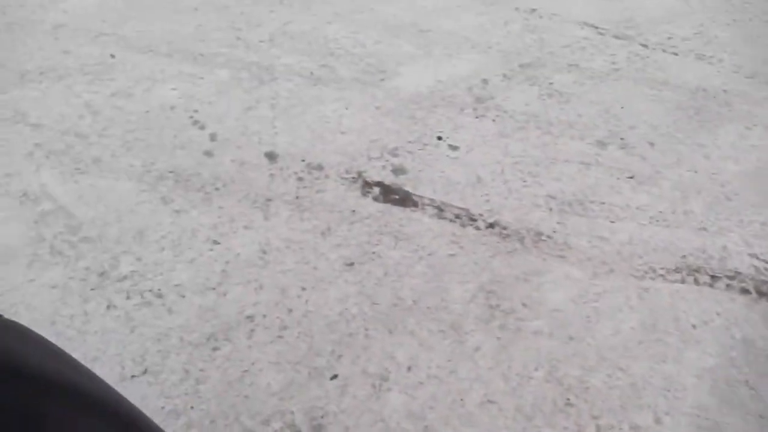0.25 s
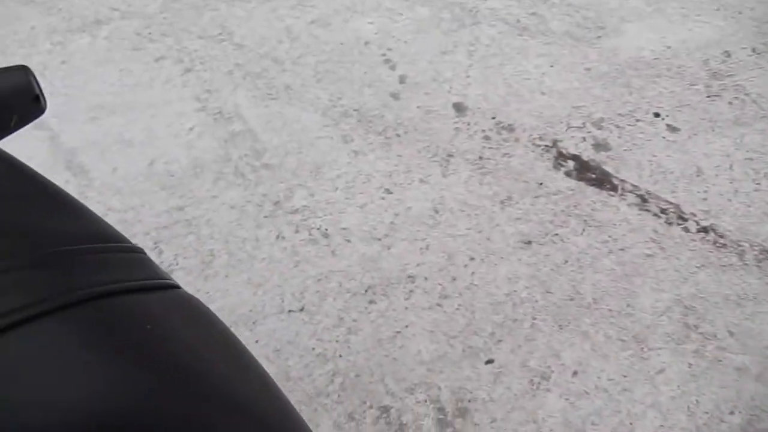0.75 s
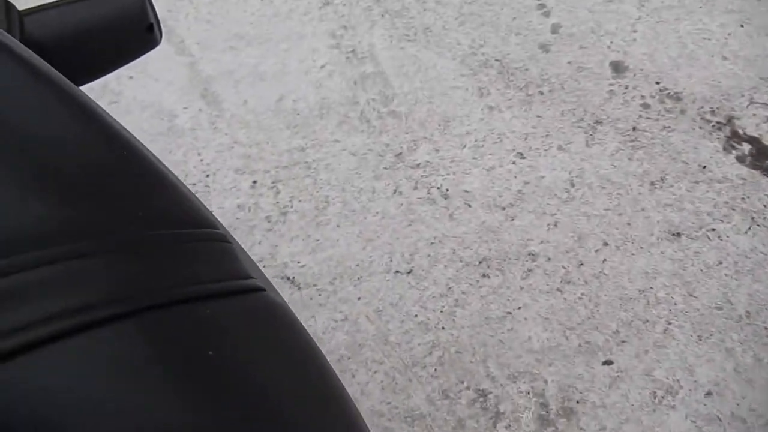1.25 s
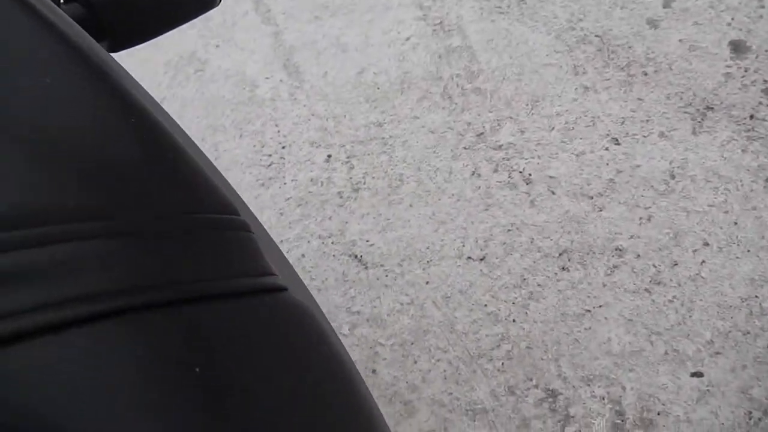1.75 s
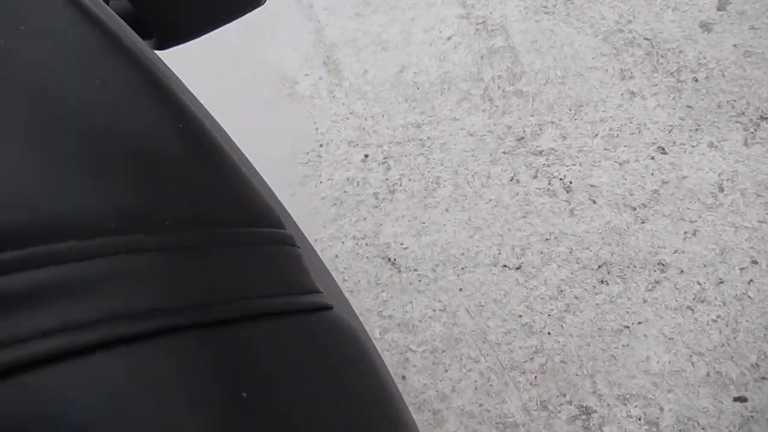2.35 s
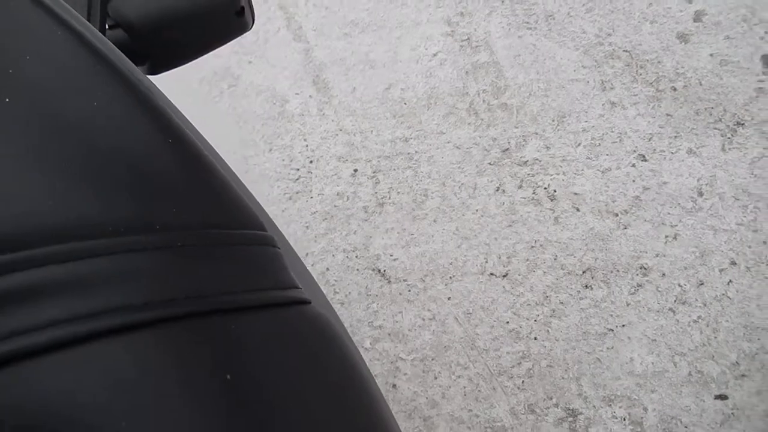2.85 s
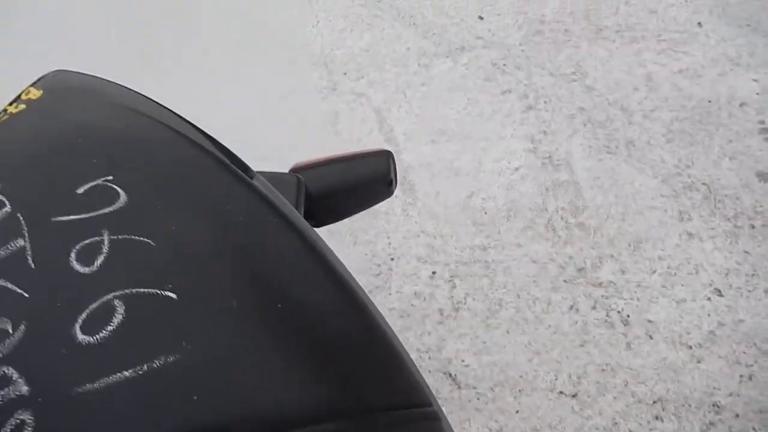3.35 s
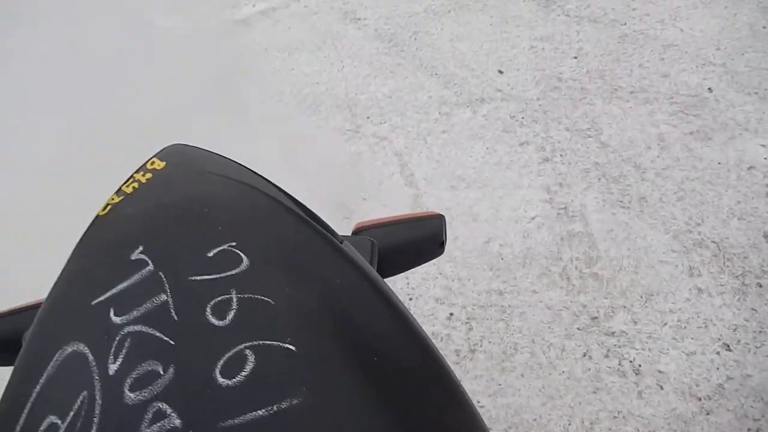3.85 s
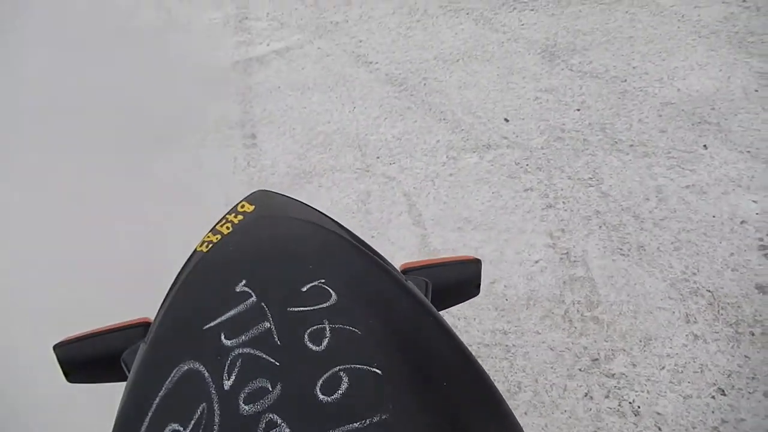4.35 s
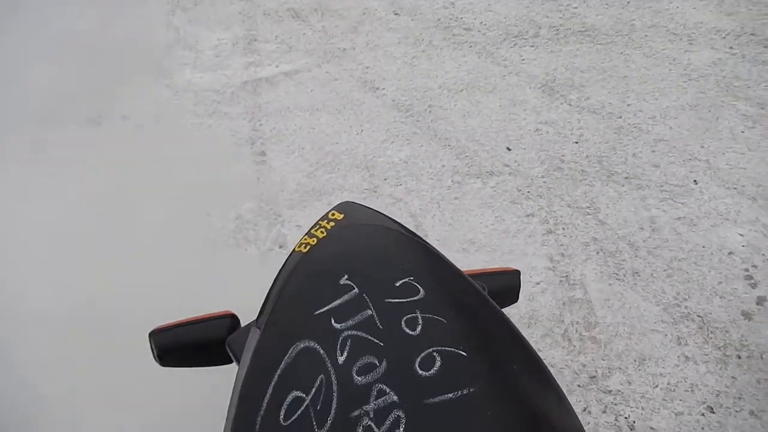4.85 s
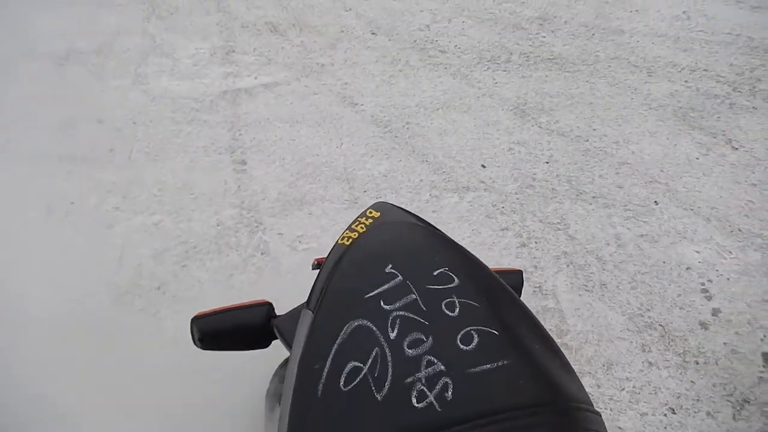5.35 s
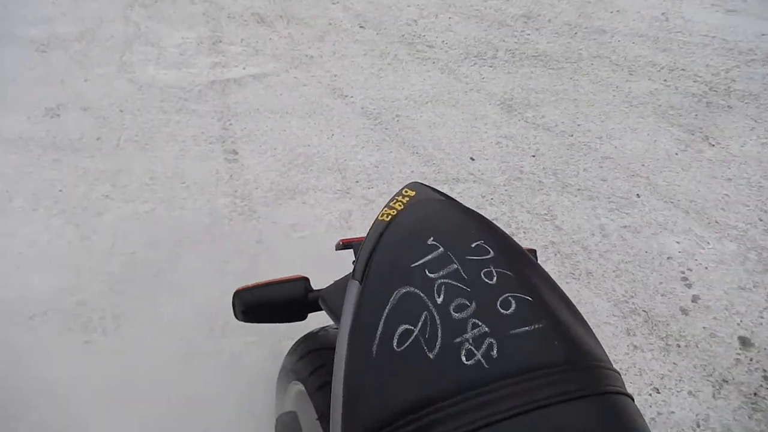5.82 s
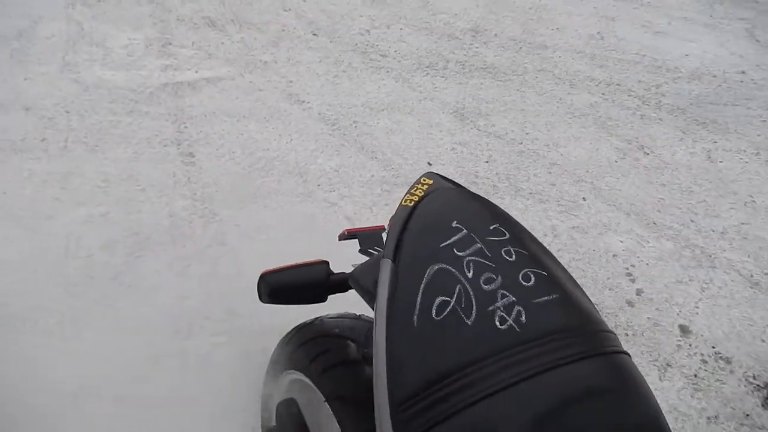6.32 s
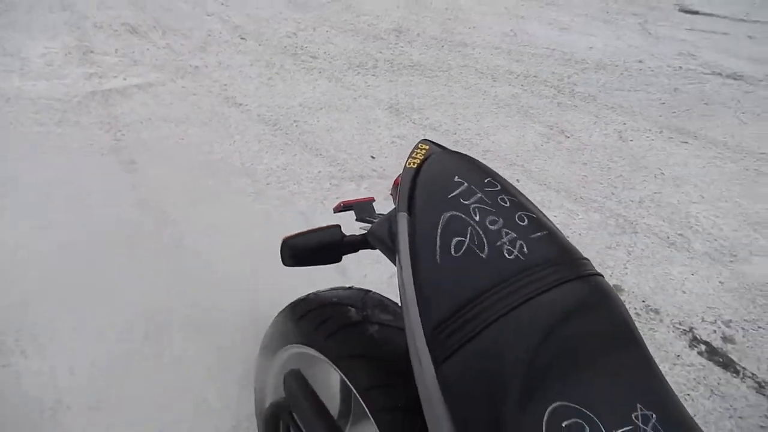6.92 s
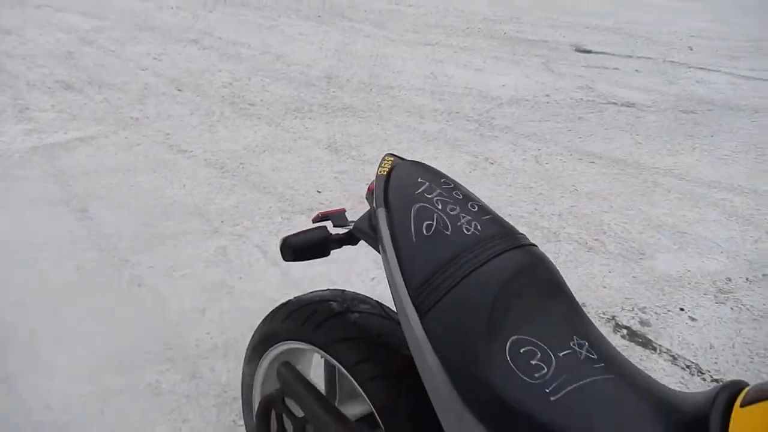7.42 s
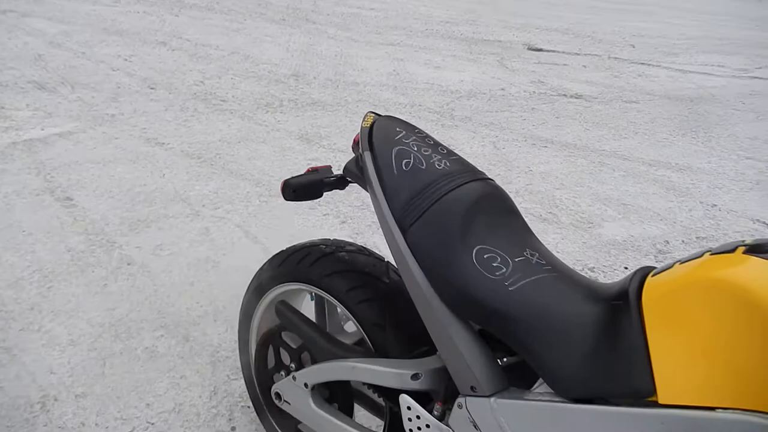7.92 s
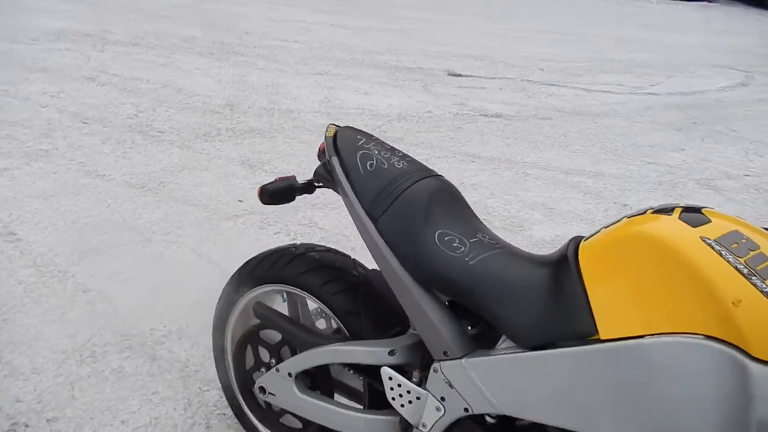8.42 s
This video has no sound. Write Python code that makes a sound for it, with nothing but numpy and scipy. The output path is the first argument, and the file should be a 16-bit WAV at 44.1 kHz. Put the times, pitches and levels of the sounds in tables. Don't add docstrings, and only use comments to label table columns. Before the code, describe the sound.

A hand-held stereo microphone sits near a motorcycle's exhaust in the open air. Deep, limping idle thumps alternate strong and weak over metallic ticking and rattling. Four uneven revs follow, gruff and snarling, with sharp pops and hollow honks from the air box. The note sags with breathy intake noise into a spitting, irregular idle, ending with brighter engine hiss and light ticks. Faint wind rumble lies beneath.

```python
import sys
import numpy as np
from scipy import signal
from scipy.fft import rfft, irfft, next_fast_len
from scipy.io import wavfile
from scipy.ndimage import uniform_filter1d

SR = 44100
rng = np.random.default_rng(int(sys.argv[2]) if len(sys.argv) > 2 else 0)


def put_to_file(sound):
    columns = np.atleast_2d(sound).T
    safe = np.clip(columns, -1, 1)
    whole_steps = np.round(safe * 32767)
    wavfile.write(sys.argv[1], SR, whole_steps.astype(np.int16))


def volts(x):
    e = np.asarray(x, float) / 20
    return 10 ** e


N = 382784
TIME_S = np.arange(N) / SR
FULL_BURN_DB = -9
IDLE_LOAD_DB = -45


def rms_one(x):
    return x / np.sqrt(np.mean(x ** 2) + 1e-20)


def curve(x, table):
    return np.interp(x, *np.transpose(table))


def at_hz(spectrum, hz):
    f, level = np.transpose(spectrum)
    return np.interp(np.log(hz), np.log(f), level)


def drift(rate):
    r = np.exp(-80 * np.pi * rate / SR)
    slow = signal.lfilter([1], [1, -2 * r, r * r], rng.standard_normal(N // 40 + 2002))[2000:]
    return np.interp(np.arange(N) / 40, np.arange(len(slow)), rms_one(slow))


def bumps(seconds, heights, widths_s):
    t = np.arange(0, N, 128)[:, None] / SR
    swells = heights * np.exp(-.5 * ((t - seconds) / widths_s) ** 2)
    return np.interp(TIME_S, t[:, 0], np.sum(swells, axis=1))


def clicks(seconds, sizes):
    out = np.full(N, 1e-18)
    out[np.clip((np.asarray(seconds) * SR).astype(int), 0, N - 1)] = sizes
    return out


def resonate(x, hz, width_hz):
    r = np.exp(-np.pi * width_hz / SR)
    top = np.array([1, 0, -1]) * (1 - r * r) / 2
    return signal.lfilter(top, [1, -2 * r * np.cos(2 * np.pi * hz / SR), r * r], x)


def coloured(x, spectrum):
    size = next_fast_len(N)
    hz = np.arange(size // 2 + 1) * SR / size + 1
    return irfft(rfft(x, size) * volts(at_hz(spectrum, hz)), size)[..., :N]


def thump(train, hz, spread_s, echo_s, echo_db):
    t = np.arange(-2000, 4001) / SR

    def burst(u):
        return -np.cos(2 * np.pi * hz * u) * np.exp(-.5 * (u / spread_s) ** 2)

    pulse = burst(t) + volts(echo_db) * burst(t - echo_s)
    return signal.fftconvolve(train, pulse)[2000:N + 2000]


# f/Hz, coherence/1
LIKENESS = [(100, .9), (500, .95), (1000, .78), (2000, .5), (4000, .7), (8000, .72), (14000, .3)]


def wide_noise():
    mid, side = rng.standard_normal((2, N))
    hz, alike = np.transpose(LIKENESS)
    alike = np.clip(alike, 0, .999)
    mid = coloured(mid, np.c_[hz, 10 * np.log10((1 + alike) / 2)])
    side = coloured(side, np.c_[hz, 10 * np.log10((1 - alike) / 2)])
    return np.array([mid + side, mid - side])


def facing(seconds):
    return np.where(np.asarray(seconds) > 8, 1.0, 0.0)


def wind():
    noise = rng.standard_normal(N)
    return volts(-51) * rms_one(resonate(resonate(noise, 30, 15), 30, 15))


# f/Hz, width/Hz, level/dB
GEAR_MODES = [(2336, 82, -54), (2800, 240, -52.5), (3780, 200, -58), (6300, 45, -62), (7700, 40, -68)]
GEAR_RISE = (6.5, 8.0)


def cam_gear():
    noise = rng.standard_normal(N) * volts(2.0 * drift(16))
    rings = 0
    for hz, width_hz, db in GEAR_MODES:
        rings += volts(db) * rms_one(resonate(resonate(noise, hz, width_hz), hz, width_hz))
    return np.interp(TIME_S, GEAR_RISE, [.25, 1]) * rings


# t/s, level/dB
INTAKE = [(0, -21), (1, -31), (2.08, -35), (2.6, -33.5), (4, -29.5), (4.5, -25.5), (5.1, -21.5),
          (5.6, -18.5), (6.3, -20), (6.8, -27.5), (7.3, -21), (8.68, -28)]
# t/s, rise/dB
GULPS = [(.32, 10), (.56, 8), (.83, 13), (1.06, 0), (1.28, 13), (1.5, 8.5), (1.73, 13), (2.03, 5),
         (2.48, 13), (3.04, 9), (3.36, 1), (3.67, 10), (4.1, 9), (4.19, 17.5), (4.72, 6), (5.58, 1),
         (5.79, 4), (6.0, -2), (6.26, 0), (6.84, 7), (7.08, 10.5), (7.23, 4), (7.47, 6.5), (7.83, 2.5),
         (8.0, -3), (8.29, 9), (8.39, 0), (8.49, 9), (8.68, 11.5)]


def air_box():
    noise = wide_noise() * volts(2.0 * drift(70))
    gulp_s, rise_db = np.transpose(GULPS)
    level_db = curve(TIME_S, INTAKE) + bumps(gulp_s, rise_db, 0.017) - 5.5
    return volts(level_db) * rms_one(resonate(resonate(noise, 531.0, 31), 497, 250))


# t/s, peak level/dB
HONKS = [(0.05, -36), (0.272, -9.5), (0.458, -22), (0.519, -20), (0.833, -16.5), (1.136, -23), (2.603, -18),
         (2.692, -20), (2.803, -25), (3.006, -21), (3.243, -22), (3.335, -7), (3.559, -15), (3.659, -29),
         (3.899, -18), (4.004, -29), (4.083, -18), (4.177, -15), (4.369, -22), (4.46, -7), (4.5, -36),
         (4.792, -7), (4.843, -18), (4.941, -17), (5.074, -17), (5.118, -56), (5.16, -21), (5.219, -9.5),
         (5.375, -14), (5.474, -25), (5.517, -22), (5.581, -13), (5.627, -9.5), (5.735, -16), (5.82, -16),
         (5.992, -14), (6.234, -10.5), (6.375, -11), (6.514, -14), (6.562, -22), (6.72, -17.5), (6.83, -19),
         (7.213, -11), (7.254, -18), (7.442, -12), (7.543, -11.5), (7.655, -16), (7.761, -14),
         (7.827, -14.5), (7.992, -17), (8.211, -11), (8.38, -11.5), (8.463, -17), (8.594, -16),
         (8.635, -16)]
# cycle rate/Hz, level/dB
HONK_BY_SPEED = [(30, 0), (40, -7)]


def honks():
    note_hz, wander_hz, attack_s, decay_s, gain_db = 534.4, 9, 0.0023, 0.026, -3.5
    s, db = np.transpose(HONKS)
    peak_db = db + gain_db + curve(curve(s, SPEED), HONK_BY_SPEED)
    t = np.arange(6000) / SR
    ring = (1 - np.exp(-t / attack_s)) * np.exp(-t / decay_s)
    shape = signal.fftconvolve(clicks(s, volts(peak_db)), ring)[:N]
    return shape * np.sin(2 * np.pi * np.cumsum(note_hz + wander_hz * drift(9.14)) / SR)


# t/s, gap to second cylinder/s, first thump level/dB, second thump level/dB, joint leak level/dB
IDLE_BEFORE = [(0.017, 0.058, -14.5, -8.5, -42.5), (0.141, .048, -9.5, -17.5, -38),
               (0.26, .053, -10, -12.5, -43), (0.386, 0.059, -9, -10.5, -40.5),
               (0.504, 0.053, -16.5, -16, -49), (0.631, 0.056, -8, -9, -44.5),
               (0.743, 0.049, -17, -13.5, -65), (0.869, 0.052, -8.5, -10, -43),
               (0.981, 0.052, -21.5, -20.5, -48), (1.105, 0.05, -9.5, -10.5, -39),
               (1.219, 0.05, -21.5, -18.5, -44), (1.343, 0.055, -9, -9.5, -39),
               (1.458, .051, -13.5, -15.5, -43), (1.578, 0.051, -7.5, -10.5, -42.5),
               (1.693, 0.055, -15.5, -11.5, -36), (1.815, 0.054, -9, -12.5, -37),
               (1.923, 0.045, -9, -10, -37), (2.013, 0.027, -11, -11, -28.5),
               (2.101, 0.031, -9, -10.5, -29.5)]
IDLE_AFTER = [(6.522, 0.035, -21, -11.5, -36), (6.642, 0.056, -18, -9, -41), (6.78, 0.079, -19, -19.5, -29),
              (6.899, 0.065, -19.5, -22, -30), (7.035, .042, -12, -22, -29), (7.2, 0.041, -17, -17.5, -55),
              (7.315, 0.06, -9, -9.5, -30), (7.451, 0.067, -19, -18.5, -11),
              (7.597, 0.056, -11, -10.5, -26.5), (7.719, 0.06, -21, -11.5, -30),
              (7.855, 0.049, -9, -12, -30.5), (7.989, 0.0445, -17.5, -12.5, -20.5),
              (8.1, 0.049, -10, -20.5, -24.5), (8.217, 0.051, -16, -15, -28), (8.341, 0.07, -10, -18, -29),
              (8.473, 0.06, -32, -13.5, -15.5), (8.605, 0.041, -7.5, -19, -35.5)]
# t/s, thump level/dB, spit level/dB
AFTERBURNS = [(0.114, -14.5, -61), (1.787, -18, -72), (2.153, -15.5, -39), (2.208, -36, -37.5),
              (2.276, -15, -35), (6.571, -21, -42), (7.167, -19, -40.5), (7.279, -19, -45),
              (7.825, -19, -43), (7.946, -21, -54), (8.073, -19, -48)]


def firings():
    s, gap_s, first_db, second_db, leak_db = np.transpose(IDLE_BEFORE + IDLE_AFTER)
    thump_db = np.r_[first_db, second_db]
    spit_db = np.r_[leak_db, leak_db - 1] + 4 * (thump_db - FULL_BURN_DB)
    return np.c_[[np.r_[s, s + gap_s], thump_db, spit_db], np.transpose(AFTERBURNS)]


def shake_db():
    full_db, lead_s, half_s = 7.5, 0.011, 0.021
    s, thump_db = firings()[:2]
    return bumps(s - lead_s, full_db * volts(thump_db - FULL_BURN_DB), half_s) - full_db


# t/s, level/dB
LOAD = [(0, -42), (.3, -40.5), (1.08, -44), (1.85, -44.5), (2.3, -37), (2.68, -35), (3.3, -38.5),
        (3.58, -33.5), (3.8, -40.5), (4.08, -33.5), (4.35, -36), (4.69, -33), (5.05, -37), (5.6, -38),
        (6.52, -40), (6.66, -42.5), (7.25, -39), (8.68, -45.5)]
# f/Hz, level/dB
RATTLE = [(45, 9), (90, 0), (300, 0.5), (440, -7.5), (560, -4), (900, -14.5), (1650, -23), (1950, -28),
          (2700, -29.5), (3600, -33.5), (4200, -31), (7000, -47), (10300, -42.5), (15500, -73)]
# cycle rate/Hz, level/dB
RUMBLE_BY_SPEED = [(36, 0), (43, -6)]
# cycle rate/Hz, level/dB
HISS_BY_SPEED = [(13, -1), (22, 0), (30, 0), (40, 1)]


def casings(throb):
    clatter_db, per_s = curve(TIME_S, LOAD), curve(TIME_S, SPEED)
    work_db = clatter_db - IDLE_LOAD_DB
    rumble_db = -37 + 0.74 * work_db + curve(per_s, RUMBLE_BY_SPEED)
    hiss_db = -55 + 1.135 * work_db + 8.5 * facing(TIME_S)
    hiss_db += curve(per_s, HISS_BY_SPEED) * (throb != 0)
    whites = [wide_noise(), wide_noise()]
    shared_db = 0.85 * drift(6.1)
    rock_db = np.where(throb == 0, shake_db() + 2.0, 0)
    groups = np.zeros((4, 2, N))
    edges = 45 * 2 ** np.arange(0, 8.6, .6)
    for k, (low, high) in enumerate(zip(edges, edges[1:])):
        sos = signal.butter(2, [low, high], "band", fs=SR, output="sos")
        band = signal.sosfilt(sos, whites[k % 2])
        rock_share = 0.44 if low > 3000 else 1
        db = shared_db + rock_share * rock_db + 2.24 * drift(17) + 0.62 * throb
        groups[np.searchsorted([300, 1000, 4000], low)] += volts(db) * band
    boom, rumble, clatter, hiss = [rms_one(coloured(x, RATTLE)) for x in groups]
    out = volts(-27.0 + .3 * (rumble_db + 36)) * boom + volts(rumble_db + 5.0) * rumble
    return out + volts(clatter_db + 0.5) * clatter + volts(hiss_db + 2.0) * hiss


# t/s, peak level/dB
TICKS = [(0.0613, -40), (0.1261, -44), (0.2648, -48), (0.3273, -30), (0.4279, -44), (0.572, -35.5),
         (0.6913, -35), (0.8101, -37), (0.8515, -41), (0.9283, -36.5), (1.046, -36.5), (1.284, -36),
         (1.4032, -34), (1.521, -33), (1.6387, -35), (1.7564, -34), (1.8692, -39), (2.0958, -29),
         (2.1969, -32.5), (2.2623, -32), (2.3371, -29), (2.482, -29), (2.7112, -35), (2.7581, -34),
         (2.9417, -44), (3.0131, -36), (3.0879, -50), (4.0427, -53), (4.171, -30), (4.2532, -37),
         (4.4927, -52), (4.9307, -40), (5.143, -34), (5.2235, -42), (5.2839, -49), (5.4615, -44),
         (5.4919, -39), (5.5443, -34), (5.5842, -57), (6.0386, -35), (6.2068, -42), (6.558, -48),
         (6.8513, -35), (6.9726, -33.5), (7.103, -33.5), (7.2465, -31), (7.3994, -36), (7.5308, -36),
         (7.666, -35), (7.7955, -29), (7.919, -32), (8.0212, -31), (8.089, -39), (8.1605, -32),
         (8.2866, -29), (8.4088, -33), (8.5438, -30), (8.5944, -44)]
# f/Hz, level/dB, t60/s
VALVE = [(1140, 1.5, 0.0063), (1616, 0.5, 0.02), (2370, -1, 0.032), (2697, -9, 0.024), (2894, -9.5, 0.024),
         (3130, -19.5, 0.018), (3970, -31, 0.013), (5230, -36, 0.018), (6300, -27, .05), (7600, -44, .06)]


def valves(count):
    start_s = np.transpose(IDLE_BEFORE + IDLE_AFTER)[0]
    hard_s, hard_db = np.transpose(TICKS)
    s = np.r_[hard_s, start_s - 0.011]
    light_db = -42 + 12 * facing(start_s) + 3 * rng.standard_normal(len(start_s))
    db = np.r_[hard_db + 9.5, light_db] - 1.5 * facing(s)
    dull_db = np.where(s < SPEED[0][0], -11.5, -15)
    quarter_cycle = np.diff(np.floor(4 * count), prepend=0) == 1
    fast = quarter_cycle * volts(curve(TIME_S, LOAD) - 4.0 + 0.93 * rng.standard_normal(N))
    trains = [clicks(s, volts(db)) + fast, clicks(s, volts(db + dull_db)) + volts(-0.5) * fast]
    bright, dull = signal.lfilter([1], [1, -np.exp(-1 / (0.013 * SR))], trains)
    out = 0
    for hz, mode_db, t60 in VALVE:
        contacts = (dull if hz < 2500 else bright) * rng.standard_normal(N)
        level_db = mode_db + 15.5 + 1.3 * drift(2.84)
        out += volts(level_db) * resonate(contacts, hz, 1.74 / t60)
    return out


# t/s, peak level/dB, ducked gain/dB (negative: raised), recovery/s
POPS = [(2.04, -13, 7, 0.082), (2.129, -15, 1, .02), (2.172, -18, 5, 0.19), (2.296, -30, 4, 0.011),
        (2.413, -41, -2, 0.0095), (2.946, -28, 6, 0.023), (3.412, -31, 0, .04), (3.811, -25, -1, 0.076),
        (4.195, -3.5, 1, 0.12), (4.532, -32, 1, 0.15), (5.162, -52, 2.5, 0.23), (5.589, -14, 2.5, 0.28),
        (5.948, -10, -4, 0.074), (6.5615, -5, 4, 0.19)]


def backfires():
    s, db = np.transpose(POPS)[:2]
    train = clicks(s, volts(db))
    crack = thump(train, 250, spread_s=0.0011, echo_s=0.0049, echo_db=-15.5)
    burst = signal.lfilter([1], [1, -np.exp(-1 / (0.0075 * SR))], train) * rng.standard_normal(N)
    burst = signal.sosfilt(signal.butter(4, 3800, fs=SR, output="sos"), burst)
    out = crack + volts(-3.5) * resonate(crack, 450, 110)
    return out + volts(2.5) * resonate(burst, 520, 460) + volts(-22) * resonate(burst, 4200, 1500)


# t/s, peak level/dB
REV_SPITS = [(2.3008, -31), (2.7159, -35), (2.7493, -37), (2.8565, -32), (2.8925, -36), (2.9324, -36),
             (2.9728, -34), (3.0052, -27), (3.0331, -34), (3.112, -27), (5.3484, -36), (5.5409, -33),
             (5.6257, -39), (5.8657, -43), (5.97, -52), (6.0199, -31), (6.0583, -46), (6.0942, -41),
             (6.1181, -42), (6.18, -40), (6.2154, -40), (6.2758, -42), (6.3526, -37), (6.4883, -33)]
# f/Hz, level/dB
SPIT = [(2500, 4.5), (4000, 6), (5500, 8), (8000, 8), (10000, 13.5), (12000, 5), (15500, -15)]


def joint_spits():
    s, _, spit_db = firings()
    t = np.arange(4000) / SR
    idle_puff = (t / 0.0094) ** 2 * np.exp(-t / 0.0048) * 2.12
    puff = signal.fftconvolve(clicks(s - .043, volts(spit_db + 8.5)), idle_puff)[:N]
    rev_s, rev_db = np.transpose(REV_SPITS)
    puff += signal.fftconvolve(clicks(rev_s, volts(rev_db - 5.5)), np.exp(-t / 0.0034))[:N]
    port_gain = volts(np.array([[-3.0], [0]]))
    spit = port_gain * puff * rms_one(coloured(wide_noise(), SPIT))
    clamp = volts(15) * resonate(spit, 4050, 70)
    return spit + clamp + volts(-3.5) * resonate(spit, 10350, 250)


def idle():
    s, thump_db, _ = firings()
    low = thump(clicks(s, volts(thump_db + 3.5)), 81.9, spread_s=0.0051, echo_s=0.02935, echo_db=-8.5)
    low += thump(clicks(s, volts(thump_db - 7.0)), 177.0, spread_s=0.0019, echo_s=0.01305, echo_db=-7.5)
    low += volts(-4.0) * resonate(low, 91.5, 12)
    gust = signal.fftconvolve(clicks(s, volts(thump_db - 25.0)), np.hanning(1700), "same")
    return low + gust * rms_one(resonate(rng.standard_normal(N), 330, 92))


# f/Hz, level/dB
PIPE = [(35, -23), (60, -5.5), (90, -2), (140, -4.5), (190, -7), (250, 0), (400, -20), (530, -12.5),
        (700, -23), (1000, -26.5)]


def pipe_db(hz, per_s, opening):
    middle = np.maximum(1 - abs(hz - 150) / 60, 0)
    bass = np.clip((80 - hz) / 25, 0, 1)
    hole = np.maximum(1 - abs(hz - 158) / 48, 0)
    hollow_db = np.interp(per_s, [20, 27], [15.5, 0])
    return at_hz(PIPE, hz) + opening * (4 * middle - 9 * bass) - hollow_db * hole


# t/s, cycle rate/Hz
SPEED = [(2.17, 20.5), (2.5, 29.4), (2.59, 31.0), (2.99, 25.3), (3.19, 36.9), (3.27, 40.4), (3.58, 33.0),
         (3.82, 44.7), (4.15, 36.9), (4.21, 38.2), (4.4, 45.4), (4.49, 46.7), (4.68, 42.2), (5.47, 25.6),
         (5.57, 23.7), (6.02, 18.0), (6.2, 15.3), (6.53, 12.3)]
ORDERS_DB = [-21, 4, -1, 2, -2.5, 3, 1.5, -3.5, -7, 2, 3, 2, -1, -1]
# t/s, depth/dB, half length/s
MISFIRES = [(2.208, 10, 0.02), (2.315, 8, 0.009), (2.433, 9, 0.011), (2.956, 4.5, 0.018), (3.24, 5, 0.08),
            (3.422, 16, 0.015), (3.6, 9, 0.0083), (3.83, 5, 0.033), (4.556, 5, 0.021), (5.63, -0.5, 0.11),
            (6.293, -2, 0.013), (6.383, 3, 0.032)]
# t/s, thump rise/dB, bark rise/dB, half length/s
CATCHES = [(2.17, 14, 18, 0.033), (2.28, 5, 1, 0.046), (2.467, 2, 3.5, 0.021), (2.824, 1.5, 1.5, 0.041),
           (3.16, 1.5, 2.5, 0.059), (3.377, 1.5, 5, 0.074), (3.63, 0, 1.5, 0.065), (3.92, -2, -0.5, .06),
           (4.088, 0.5, 3, 0.064), (4.68, 2, 2.5, 0.071), (5.166, 2, 4, 0.11), (5.5, 0, 0, 0.099),
           (6.16, 3.5, 9, 0.078)]
# cycle rate/Hz, level/dB
THUMP_BY_SPEED = [(12, -23), (18, -17.5), (28, -13.5), (38, -14.5), (46, -17.5)]
BARK_BY_SPEED = [(12, -30.5), (18, -26.5), (28, -23.5), (38, -20), (46, -19.5)]
SNARL_BY_SPEED = [(30, -37), (36, -28), (42, -21.5), (46.5, -18.5)]


def revving():
    span = slice(int(SPEED[0][0] * SR), int(SPEED[-1][0] * SR))
    per_s, load_db = curve(TIME_S, SPEED)[span], curve(TIME_S, LOAD)[span]
    cycles = np.cumsum(per_s) / SR + .1
    gained = uniform_filter1d(np.gradient(per_s) * SR, size=3000)
    opening = np.clip(gained / 35, 0, 1)

    skipped_db = bumps(*np.transpose(MISFIRES))[span]
    s, thump_rise_db, bark_rise_db, half_s = np.transpose(CATCHES)
    thump_db = curve(per_s, THUMP_BY_SPEED) - skipped_db + bumps(s, thump_rise_db, half_s)[span]
    bark_db = curve(per_s, BARK_BY_SPEED) + 0.35 * (load_db + 31.5)
    bark_db += bumps(s, bark_rise_db, half_s)[span] - skipped_db
    snarl_db = curve(per_s, SNARL_BY_SPEED) + 6 * opening - 2 + 1.2 * (load_db + 34)

    smear = np.interp(per_s, [14, 28], [.1, .4])
    pattern = np.interp(per_s, [22, 34], [.1, 1])
    pattern = pattern * (1 - .6 * opening)
    orders_db = ORDERS_DB + [-0.5] * 10
    low, high, top = 0, 0, 0
    for k in range(1, 21):
        hz = k * per_s
        pair = np.angle(1 + 0.85 * np.exp(-2j * np.pi * k * 315 / 720))
        level_db = pipe_db(hz, per_s, opening) + pattern * orders_db[k - 1]
        wave = -volts(level_db) * np.cos(2 * np.pi * k * cycles + pair - smear * k ** 2)
        wave *= volts(np.interp(cycles, np.arange(0, 160, 4), rng.normal(0, 3, 40)))
        bark_share = np.clip((hz - 140) / 50, 0, 1)
        snarl_share = np.clip((hz - 310) / 60, 0, 1)
        low = low + (1 - bark_share) * wave
        high = high + (bark_share - snarl_share) * wave
        top = top + snarl_share * wave

    def even(x):
        return x / np.sqrt(uniform_filter1d(x ** 2, size=4000) + 1e-9)

    uneven_db = np.interp(per_s, [27, 36], [5.5, 1.5])
    luck = np.minimum(rng.standard_normal(400), 1)
    strength = volts(uneven_db * np.interp(2 * cycles + .5, np.arange(400), luck))
    fade = signal.windows.tukey(len(cycles), .015)
    note = volts(thump_db - 1.0) * even(low) + volts(bark_db - 1.0) * even(high) + volts(snarl_db) * even(top)
    sound, throb, count = np.zeros((3, N))
    sound[span] = fade * strength * note
    throb[span], count[span] = np.cos(4 * np.pi * cycles), cycles
    return sound, throb, count


# f/Hz, left minus right level/dB
PORT_TILT = [(60, 0), (100, -1), (180, 0), (310, -1.5), (550, -1.5), (950, -1), (1650, -0.5), (2860, -7.5),
             (4970, -1), (8640, -11.5), (15000, -9.5)]


def scene():
    lag = 6
    revs, throb, count = revving()
    both = cam_gear() + air_box() + honks() + casings(throb) + valves(count)
    both = both + backfires() + joint_spits() + idle() + revs
    tilt = np.array(PORT_TILT) * [1, .5]
    left = np.r_[np.zeros(lag), coloured(both[0], tilt)[:-lag]]
    return np.array([left, coloured(both[1], tilt * [1, -1])])


def low_pass(x):
    return signal.sosfilt(signal.butter(12, 15710, fs=SR, output="sos"), x)


def record(dry):
    gain_db = np.zeros(N)
    for s, _, duck_db, back_s in POPS:
        late = np.maximum(TIME_S - s - .006, 0)
        gain_db -= duck_db * (1 - np.exp(-late / 0.0012)) * np.exp(-(late / back_s) ** 2)
    bass_cut = signal.butter(3, 51, "high", fs=SR, output="sos")
    mix = signal.sosfiltfilt(bass_cut, dry * volts(gain_db)) + wind()
    squeezed = .85 * np.tanh(mix / .85)
    mix = signal.sosfilt(signal.cheby2(10, 50, 16200, fs=SR, output="sos"), squeezed)
    return low_pass(mix)


dry = scene()
out = record(dry)
put_to_file(out)
```